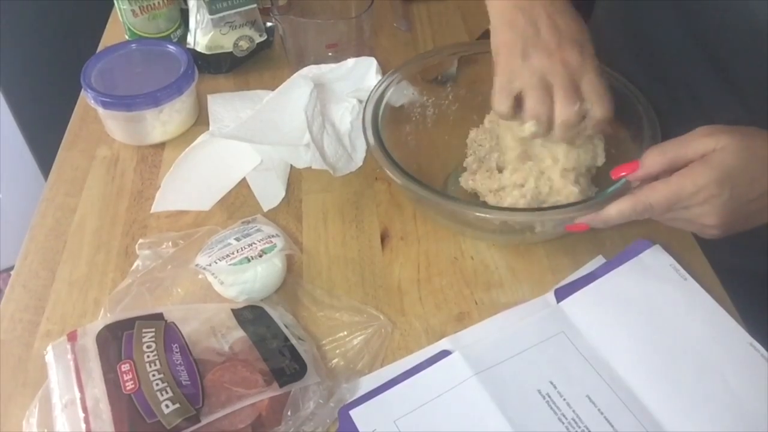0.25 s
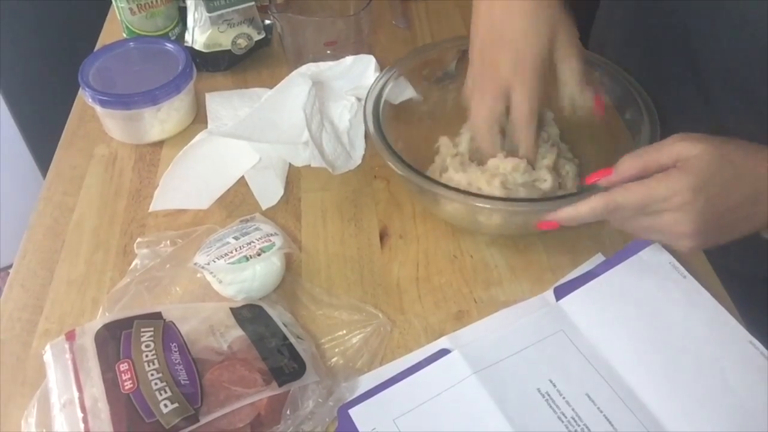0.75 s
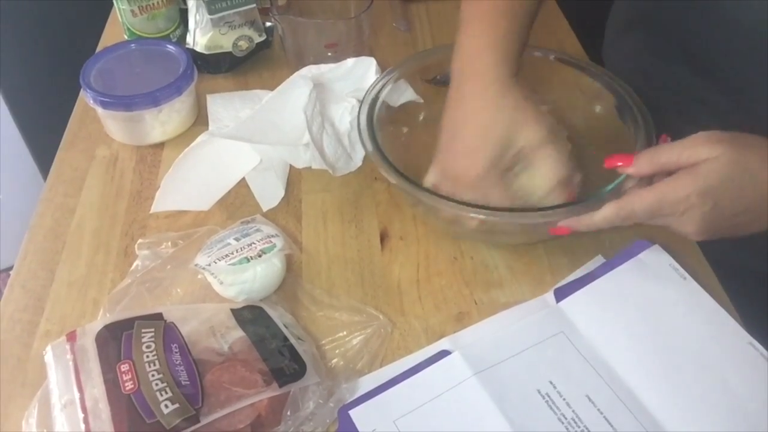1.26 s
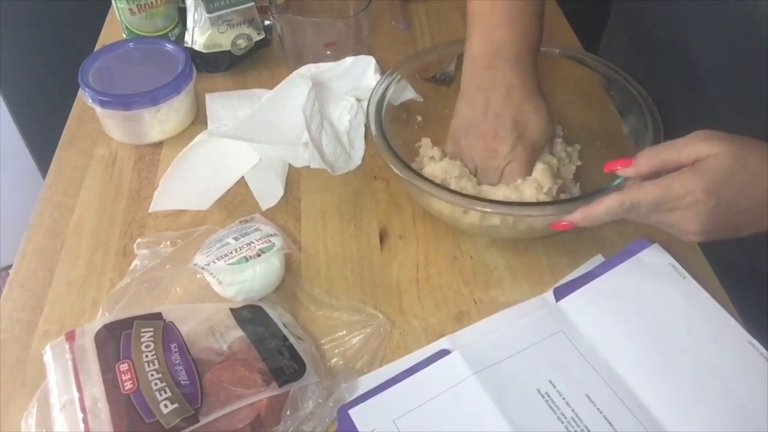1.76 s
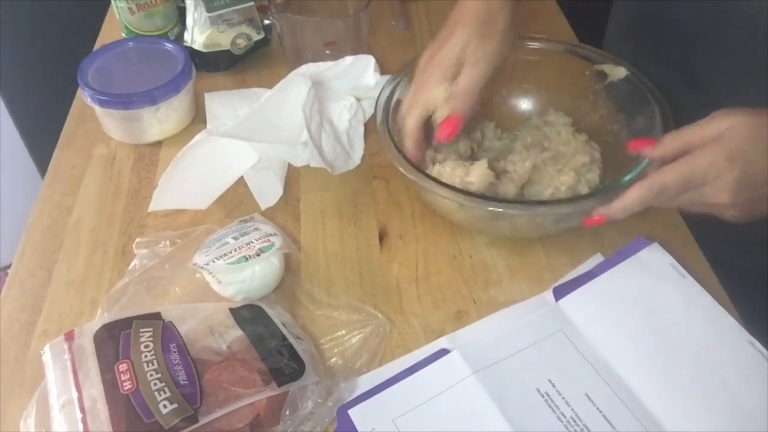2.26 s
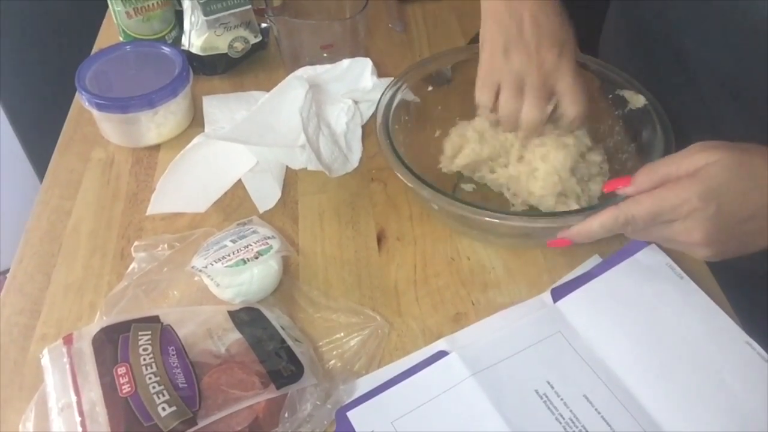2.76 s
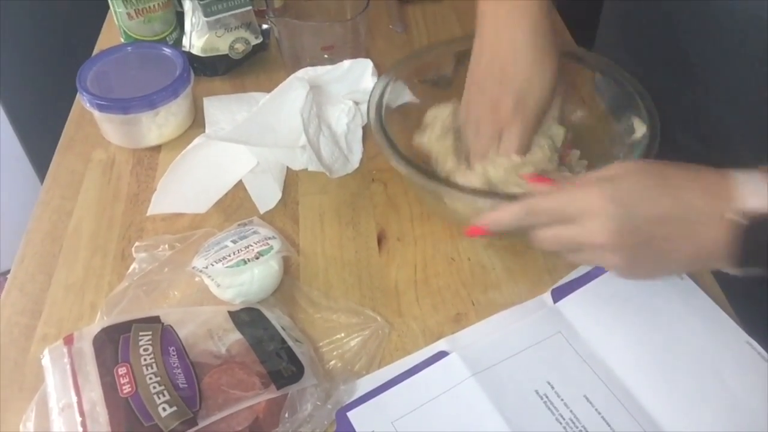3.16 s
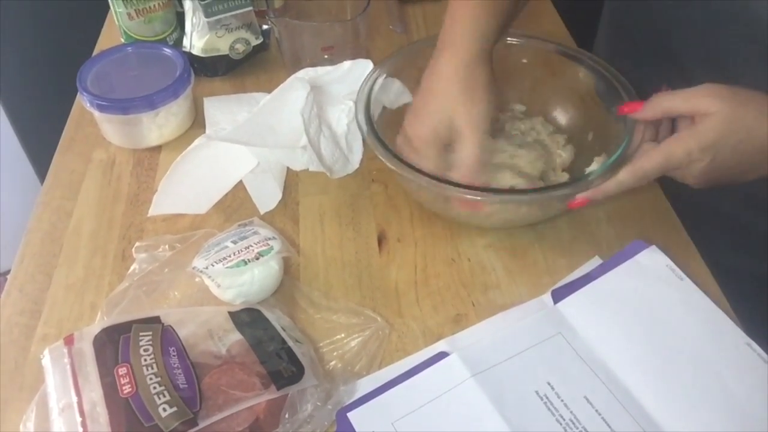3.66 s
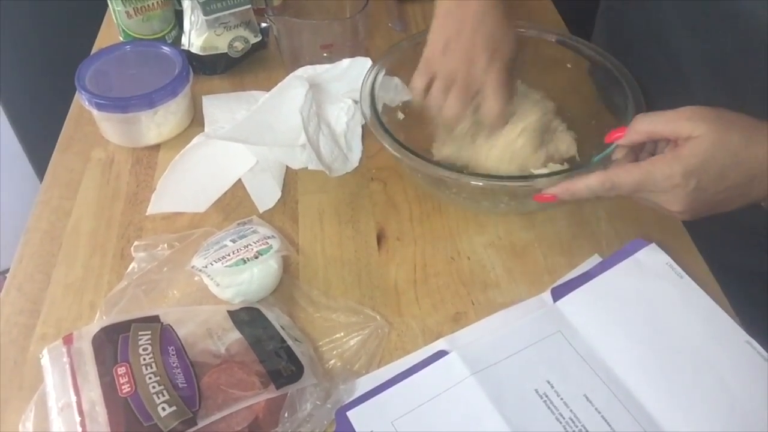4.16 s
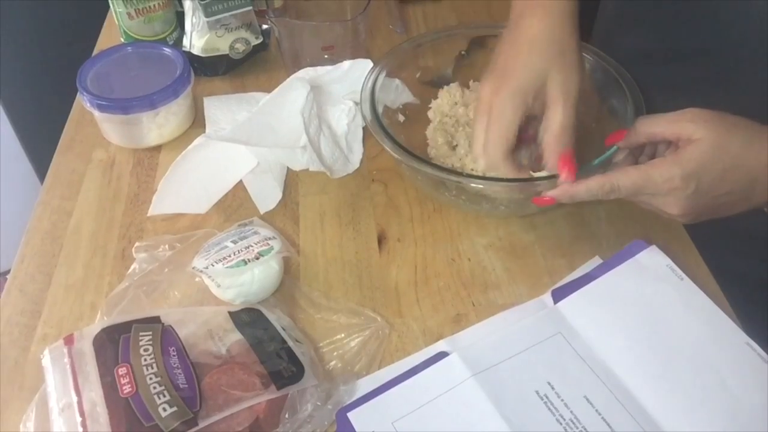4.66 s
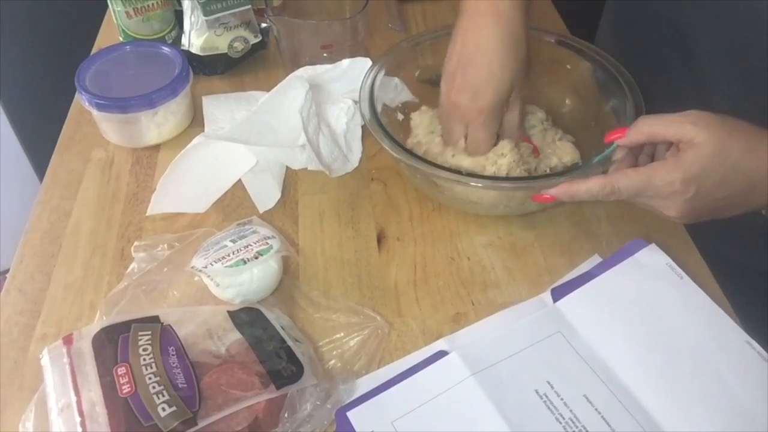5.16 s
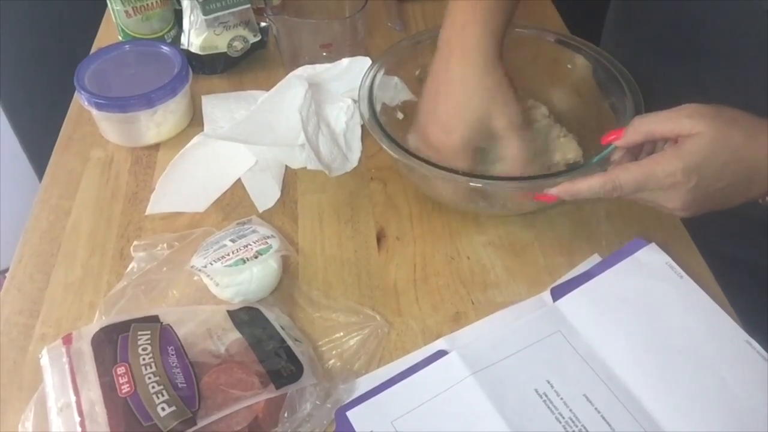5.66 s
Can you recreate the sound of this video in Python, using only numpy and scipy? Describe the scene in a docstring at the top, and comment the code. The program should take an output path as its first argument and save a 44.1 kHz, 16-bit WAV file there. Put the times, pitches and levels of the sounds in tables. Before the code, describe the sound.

Close, mono kitchen sound: a glass bowl's foot thuds on a wooden board, short and dry with a brief room echo. Two isolated clunks lead to a rapid tumble of knocks with bright glass clicks just after two seconds. A long quieter stretch follows, with barely audible dough smacks, soft rubbing and delicate nail taps on glass, then several dull, boomy bumps close the scene over faint air and hiss.

```python
"""Glass bowl on a wooden counter

Dough is kneaded in the bowl; its foot knocks the counter, ringing board modes and a dense noise burst.
Fingernails ring the glass modes; sticky dough smacks as short noise bursts; slides are swelling noise bands.
Each knock, tap and smack has a decaying noise echo of the kitchen; rumble, air and hiss lie beneath."""
import sys
import numpy as np
from scipy import signal
from scipy.fft import rfft, irfft, next_fast_len
from scipy.io import wavfile
from scipy.ndimage import map_coordinates

SR = 44100
rng = np.random.default_rng(int(sys.argv[2]) if len(sys.argv) > 2 else 0)


def persist_wave(psi):
    """Save psi, clipped to +-1, as 16-bit WAV."""
    counts = np.round(np.clip(psi, -1, 1) * 32767).astype(np.int16)
    wavfile.write(sys.argv[1], SR, np.atleast_2d(counts).T)


N = 260025
SPAN = SR // 2  # longest sound of one contact, samples
T = np.arange(SPAN) / SR  # s
F = np.fft.rfftfreq(2 * SPAN, 1 / SR)  # Hz


def amp(db):
    """Decibels to gain."""
    return 10 ** (np.asarray(db) / 20)


def unit(x):
    """Scale to rms 1."""
    return x / np.sqrt(np.mean(x ** 2) + 1e-20)


def along(points, hz):
    """Interpolate (Hz, value) points on a log frequency axis."""
    point_hz, value = np.transpose(points)
    return np.interp(np.log(hz + 1), np.log(point_hz + 1), value)


def wobble(knots_per_s):
    """Smooth random curve through normally distributed knots."""
    knots = rng.standard_normal(int(N * knots_per_s / SR) + 4)
    return map_coordinates(knots, [np.arange(N) * knots_per_s / SR])


def noise(spectrum):
    """Steady noise of rms 1 with the given colour."""
    m = next_fast_len(N)
    colour = amp(along(spectrum, np.fft.rfftfreq(m, 1 / SR)))
    return unit(irfft(rfft(rng.standard_normal(m)) * colour, m)[:N])


def cavity(centre_hz, width):
    """Response of one broad resonance; width is a share of the centre."""
    u = 1j * F / centre_hz
    return width * u / (1 + width * u + u * u)


def through(x, response):
    """Filter one contact's sound by a response on the grid F."""
    return irfft(rfft(x, 2 * SPAN) * response)[:SPAN]


def ring(hz, level_db, t60_s, scatter_db, split):
    """Decaying modes of random strength and sign; a weaker twin, a share split higher, makes each beat."""
    strength_db = level_db + scatter_db * rng.standard_normal(len(hz))
    gain = amp(strength_db) * rng.choice([-1, 1], len(hz))
    phase = 2 * np.pi * hz[:, None] * T
    twin = rng.uniform(.25, .6, (len(hz), 1)) * np.sin(phase * (1 + split))
    decay = amp(-60 * T / t60_s[:, None])
    return gain @ (decay * (np.sin(phase) + twin))


# kitchen reverberation: (frequency_hz, t60_s)
KITCHEN_DECAY = [(100, 0.22), (300, 0.29), (700, 0.36), (1500, 0.37), (4000, 0.24), (10000, 0.3)]


def kitchen_tail():
    """Noise of unit energy whose decay time depends on frequency."""
    hz, t, z = signal.stft(rng.standard_normal(SPAN), SR, nperseg=256)
    decay = amp(-60 * t / np.abs(along(KITCHEN_DECAY, hz))[:, None])
    tail = signal.istft(z * decay, SR, nperseg=256)[1][:SPAN]
    tail *= 1 - np.exp(-T / 0.0016)  # nearest walls answer after a few ms
    return tail / np.linalg.norm(tail)


def add(out, start_s, level_db, direct, all_round, wet_db):
    """Place a sound by the rms of its first 12 ms, plus the kitchen's echo of what it sends all round."""
    echo = through(all_round, rfft(kitchen_tail(), 2 * SPAN))
    gain = amp(level_db) / np.std(direct[:round(.012 * SR)])
    out[round(start_s * SR):][:SPAN] += gain * (direct + amp(wet_db) * echo)


# hiss colour, relative: (frequency_hz, density_db_per_hz)
HISS_COLOUR = [(1290, -32.5), (2200, -4.5), (2600, -1.5), (3850, 3.5), (4120, 2.5), (4910, -2.5), (5850, 2),
               (7960, -2.5), (9570, -1.5), (10500, -8), (11600, -2), (15200, -10), (16200, -13)]


def hiss():
    """Faint coloured noise, slightly restless in level."""
    return amp(-74 + 0.23 * wobble(18)) * noise(HISS_COLOUR)


# room air colour, relative: (frequency_hz, density_db_per_hz)
AIR_COLOUR = [(180, -23), (300, 0), (441, -2), (786, -3), (1240, -3.5), (3000, -10), (3900, -33),
              (6600, -120)]


def room_air():
    """Mid-band noise of slowly varying level."""
    return amp(-74 + 0.62 * wobble(4.3)) * noise(AIR_COLOUR)


# kneading rumble colour, relative: (frequency_hz, density_db_per_hz)
RUMBLE_COLOUR = [(15, -46), (25, -31.5), (43, -7.5), (112, -2), (193, -3.5), (220, -12), (252, -5.5),
                 (450, -29), (580, -42), (990, -120)]


def kneading_rumble():
    """Kneading heard through the board: low noise in lumps."""
    return amp(-73.5 + 1.8 * wobble(12)) * noise(RUMBLE_COLOUR)


# bowl or hand slides: (start_s, length_s, level_db: rms before the swell, centre_hz)
SLIDE_EVENTS = [(.12, 0.097, -77, 5000), (1.196, 0.14, -71.5, 1230), (2.105, 0.052, -59.5, 3560),
                (2.145, 0.043, -64, 4350), (2.325, 0.03, -59.5, 3810), (3.189, 0.2, -67, 1296),
                (3.95, 0.14, -75.5, 1500), (4.232, 0.098, -76.5, 5000), (5.17, 0.13, -74, 11500)]


def slides():
    """Rubbing: a band of noise swells and fades over a half sine."""
    out = np.zeros(N + SPAN)
    for start_s, length_s, level_db, centre_hz in SLIDE_EVENTS:
        swell = np.sin(np.pi * np.clip(T / length_s, 0, 1))
        rub = unit(through(rng.standard_normal(SPAN), cavity(centre_hz, 1.05) ** 3))
        out[round(start_s * SR):][:SPAN] += amp(level_db) * swell * rub
    return out[:N]


# dough letting go of glass and skin: (start_s, level_db, centre_hz)
SMACK_EVENTS = [(0.1166, -72.5, 4860), (0.4307, -62.5, 3170), (.7552, -75, 3640), (2.058, -64.5, 7100),
                (2.792, -77, 8700), (2.7982, -63, 3714), (2.9841, -71, 5960), (3.0140, -65, 10820),
                (3.1063, -72, 3380), (3.2172, -63, 1670), (3.4191, -66.5, 3320), (3.8054, -75.5, 8040),
                (3.8420, -69.5, 1907), (3.935, -70.5, 2830), (4.2454, -68.5, 9080), (4.475, -73.5, 5780),
                (5.6746, -61.5, 9500)]
SMACK_T60_S, SMACK_RISE_S = 0.043, 0.00026


def smacks():
    """Short wet noise burst around the resonance of the opening pocket, with broad skirts."""
    out = np.zeros(N + SPAN)
    for start_s, level_db, centre_hz in SMACK_EVENTS:
        envelope = amp(-60 * T / SMACK_T60_S) * (1 - np.exp(-T / SMACK_RISE_S))
        burst = rng.standard_normal(SPAN) * envelope
        skirts = amp(-16.0) * cavity(5900, 1.1) ** 2
        smack = through(burst, cavity(centre_hz, 0.28) + skirts)
        add(out, start_s, level_db, smack, smack, wet_db=-6)
    return out[:N]


# bowl rim modes: (pitch_hz, level_db, t60_s)
RIM_MODES = [(528, -12, .2), (1415, -4, .085), (2580, -3, .1), (4050, -2, .1), (5652, -1, .075),
             (7385, -2, .085), (9180, -2, .06), (11050, -5, .045), (13015, -10, .045), (15140, -10, .05)]
# bowl wall modes: (pitch_hz, level_db, t60_s)
WALL_MODES = [(3500, -12, .03), (8020, -5, .09), (8605, -5, .09), (9320, 0, .06), (10290, -13, .1),
              (11670, -9, .11), (13360, -6, .05), (14400, -14, .04)]
# nails on glass: (start_s, level_db, favoured_hz, lead_db, slope_db_per_octave: positive falls below favoured_hz)
TAP_EVENTS = [(0.015, -72, 2630, 5, -2), (0.0806, -69.5, 1415, 3, 1), (0.3652, -44, 5570, 3.5, 1),
              (1.037, -70.5, 4050, 19, 1), (1.1025, -60.5, 5700, -5, -0.5), (1.2074, -54, 8020, 5, -0.5),
              (1.4559, -72.5, 5652, 6, 1), (1.9732, -67.5, 5600, 1, -3), (2.157, -59, 9000, -13, -16),
              (2.2419, -46.5, 4100, 3.5, -2), (2.3988, -42, 7400, 4, 11.5), (2.7107, -67.5, 5770, 9.5, 9),
              (3.3205, -67.5, 4150, 4.5, 10), (3.5685, -60.5, 4080, 13, -4),
              (3.6212, -67.5, 4020, -4.5, 12.5), (3.7311, -64, 4090, 11, 2), (4.0075, -66, 2543, 6, 7.5),
              (4.769, -66.5, 5700, 5, -2), (5.622, -66, 4050, 1.5, 3), (5.7566, -74, 4020, 22, 6)]
ABOVE_DB_PER_OCTAVE, WALL_DB = 3.8, -1.5  # loss above the favoured mode; wall against rim modes


def taps():
    """Where the nail lands decides which glass mode leads; the others depend on their distance from it."""
    out = np.zeros(N + SPAN)
    hz, mode_db, t60_s = np.transpose(np.concatenate((RIM_MODES, WALL_MODES)))
    is_wall = np.arange(len(hz)) >= len(RIM_MODES)
    for start_s, level_db, favoured_hz, lead_db, slope_db_per_octave in TAP_EVENTS:
        octaves = np.log2(hz / favoured_hz)
        leads = np.arange(len(hz)) == np.argmin(np.abs(octaves))
        # the lower of two slopes
        distance_db = np.minimum(slope_db_per_octave * octaves, -ABOVE_DB_PER_OCTAVE * octaves)
        others_db = mode_db + WALL_DB * is_wall + distance_db - lead_db
        glass = ring(hz, np.where(leads, 0, others_db), t60_s, scatter_db=2.5, split=.008)
        burst = rng.standard_normal(SPAN) * amp(7.5 - lead_db - 60 * T / 0.024)
        tap = glass + through(burst, cavity(7000, 0.53))
        add(out, start_s, level_db, tap, tap, wet_db=-13)
    return out[:N]


# counter board modes: (pitch_hz, level_db, free_t60_s: before the contact's share and limits)
BOARD_MODES = [(129.4, -1.5, 0.12), (192.6, -6, 0.12), (336.7, -2, 0.1), (530.7, -14.5, 0.41),
               (622.7, -14, 0.37), (751, -21.5, 0.37), (843, -12, 0.3), (850, -9.5, 0.052),
               (974.6, -11.5, 0.11), (1182, -25, 0.64), (1234, -12.5, 0.06), (1222, -4.5, 0.11)]
# bowl foot meets counter: (start_s, level_db, boom_db: added to modes below 250 Hz)
KNOCK_EVENTS = [(0.081, -56, 14), (0.747, -67, 11), (0.831, -58, 7), (0.852, -36.5, 11.5),
                (0.865, -25, 3.5), (1.178, -65, 9), (1.202, -58.5, 2), (1.232, -64, 13), (1.321, -61.5, 10),
                (1.352, -60.5, 4.5), (1.597, -63, 2), (1.761, -18, 1), (2.075, -36.5, 9.5),
                (2.113, -30.5, 2), (2.138, -40.5, -4), (2.160, -39, 21), (2.170, -32, 7.5),
                (2.198, -37.5, 11.5), (2.215, -39, 10), (2.235, -35.5, 13), (2.262, -36, 4.5),
                (2.283, -44.5, 15), (2.312, -43, -10), (2.331, -25.5, 6), (2.411, -19.5, -1),
                (2.6, -52.5, 7), (3.165, -63, 14.5), (3.216, -59.5, 4), (3.270, -54.5, 6),
                (3.626, -67.5, 16.5), (3.679, -68.5, 11.5), (3.794, -55.5, 9.5), (5.303, -56, 15),
                (5.394, -42, 9.5), (5.432, -55.5, 9), (5.462, -67, 12.5), (5.626, -65.5, 2.5),
                (5.75, -47, 17), (5.786, -38.5, 8), (5.835, -49, 15), (5.867, -60, 10)]
# a stronger blow is a harder contact: its corner doubles per step in level
HARD_DB, HARD_HZ, DB_PER_OCTAVE = -30, 2200, 18.5
BOOM_DB_PER_OCTAVE = 38  # a flat landing booms and is duller: boom that halves the corner
SOFT_DB, SOFT_HZ = -49.5, 290  # at or below this level the foot stays pressed down: a dull push
FREE_HARD, FREE_SOFT = 0.55, .45  # share of the board's free t60 after a blow, a push
SPREAD_S = 0.001  # bending-wave delay to the near edge at 1 kHz; lower ones are slower
EDGE_DB, EDGE_DB_PER_DB = -16, 0.7  # bite of the foot's hard edge at HARD_DB; growth with level


def knocks():
    """Each blow rings the board; a soft contact builds up slowly and passes fewer highs."""
    out = np.zeros(N + SPAN)
    hz, mode_db, free_t60_s = np.transpose(BOARD_MODES)
    low_cut = (1j * F / 85 / (1 + 1j * F / 85)) ** 4  # board radiates no deep bass
    dense = 1j * F / 500 / (1 + 1j * F / 500)  # modes crowd together above the lowest
    thick = 1 / (1 + 1j * F / 900) ** 1.11  # thick wood swallows highs
    bending = np.exp(-4j * np.pi * SPREAD_S * np.sqrt(1000 * F))
    for start_s, level_db, boom_db in KNOCK_EVENTS:
        if level_db > SOFT_DB:
            corner_octaves = (level_db - HARD_DB) / DB_PER_OCTAVE - boom_db / BOOM_DB_PER_OCTAVE
            corner_hz, free = HARD_HZ * 2 ** corner_octaves, FREE_HARD
        else:
            corner_hz, free = SOFT_HZ, FREE_SOFT
        t60_s = np.clip(free_t60_s * free, .01, .2)
        board = ring(hz, mode_db + boom_db * (hz < 250), t60_s, scatter_db=1.5, split=.08)
        burst = amp(16.5 - 60 * T / 0.035) * rng.standard_normal(SPAN)
        # summed over all directions the crowded modes even out to one impulse
        impulse = np.linalg.norm(burst) * (T == 0)
        rise = 1 - np.exp(-T * corner_hz / 1.7)
        u = 1j * F / corner_hz
        soft_contact = 1 / (1 + 1.48 * u + u * u) ** 2
        edge = amp(EDGE_DB + EDGE_DB_PER_DB * (level_db - HARD_DB)) * cavity(4200, 1.1) ** 3
        path = (soft_contact + edge) * thick * low_cut * bending
        near = through(rise * (board + through(burst, dense)), path)
        all_round = through(rise * board + through(impulse, dense), path)
        add(out, start_s, level_db, near, all_round, wet_db=-4.0)
    return out[:N]


def scene():
    """Mono sum of all layers."""
    background = hiss() + room_air() + kneading_rumble()
    return (background + slides() + smacks() + taps() + knocks())[None]


TOP_HZ = 16050


def record(dry):
    """Sharp band limit: nothing passes from TOP_HZ up."""
    m = next_fast_len(N + SPAN)
    passes = np.fft.rfftfreq(m, 1 / SR) < TOP_HZ
    return irfft(rfft(dry, m) * passes, m)[:, :N]


dry = scene()
out = record(dry)
persist_wave(out)
```